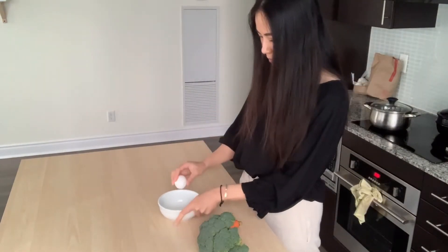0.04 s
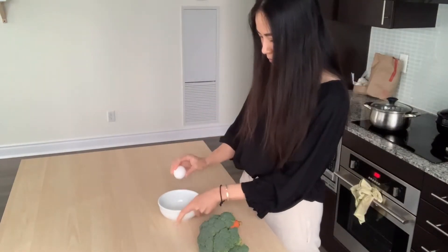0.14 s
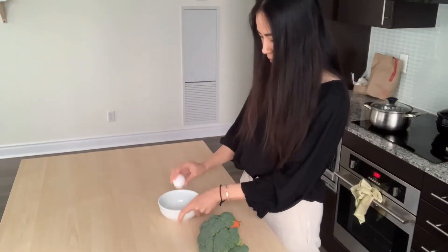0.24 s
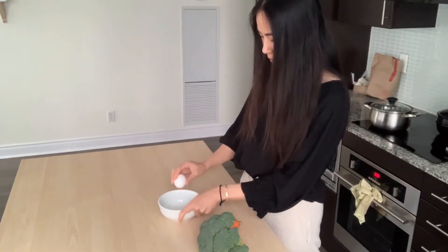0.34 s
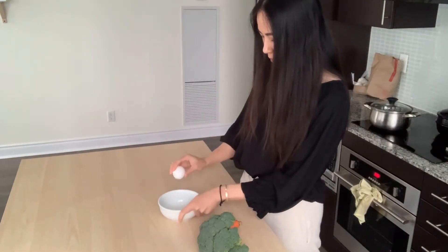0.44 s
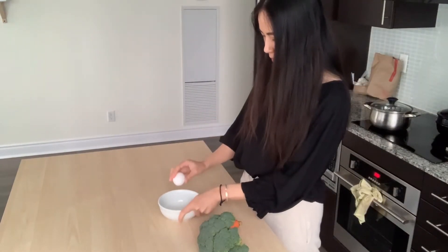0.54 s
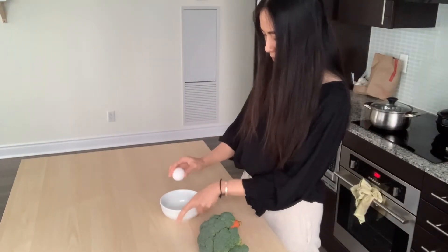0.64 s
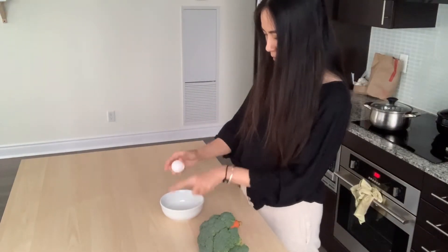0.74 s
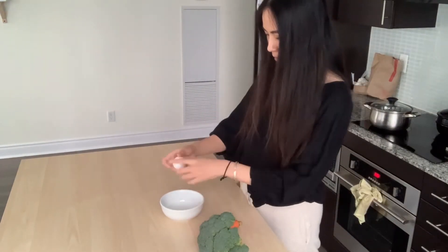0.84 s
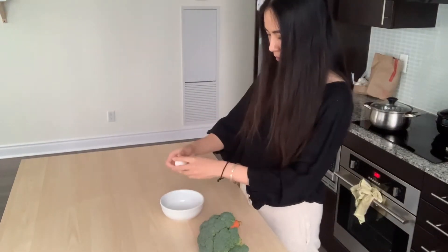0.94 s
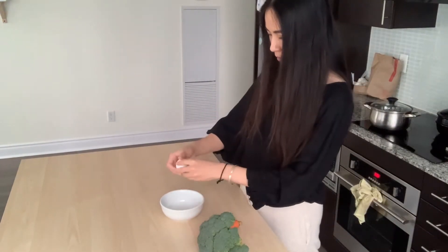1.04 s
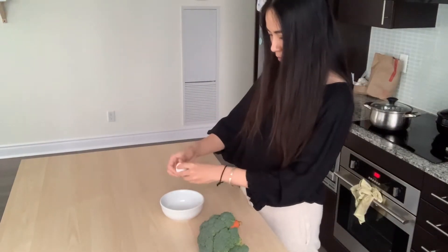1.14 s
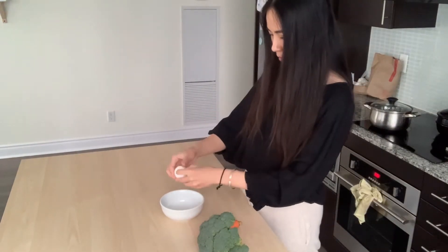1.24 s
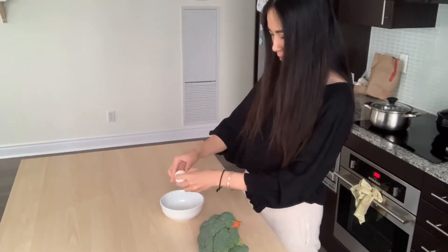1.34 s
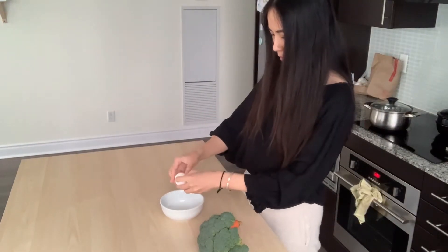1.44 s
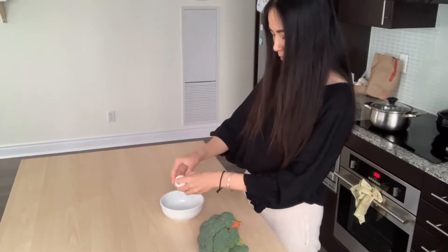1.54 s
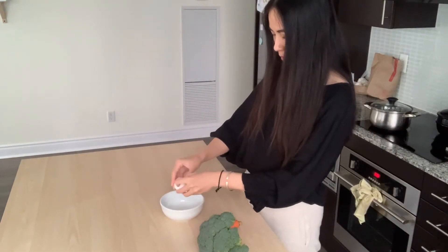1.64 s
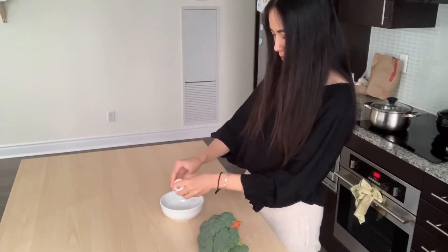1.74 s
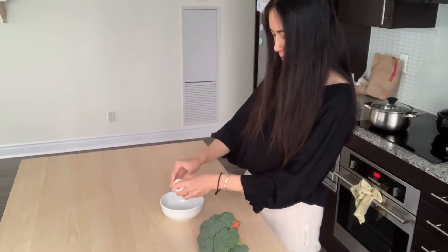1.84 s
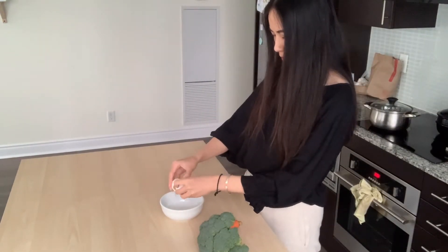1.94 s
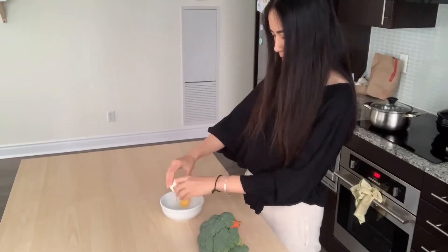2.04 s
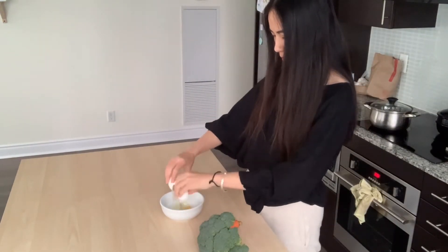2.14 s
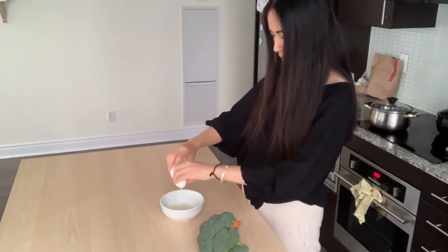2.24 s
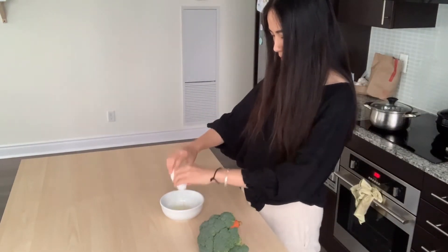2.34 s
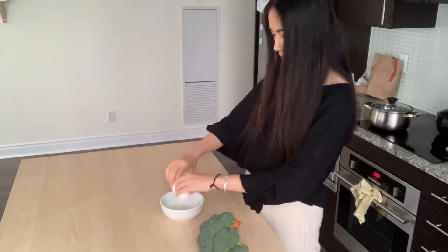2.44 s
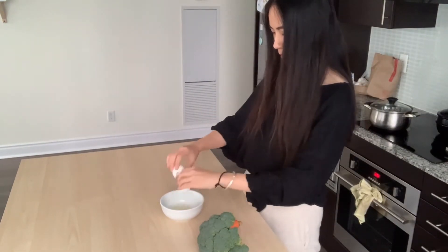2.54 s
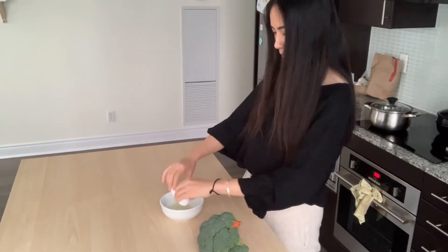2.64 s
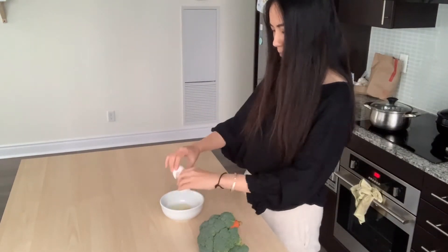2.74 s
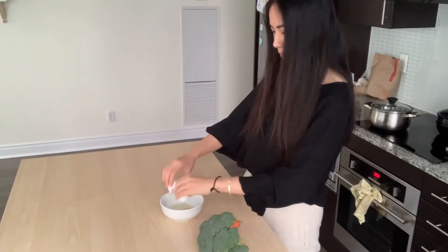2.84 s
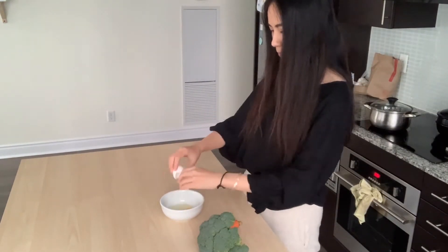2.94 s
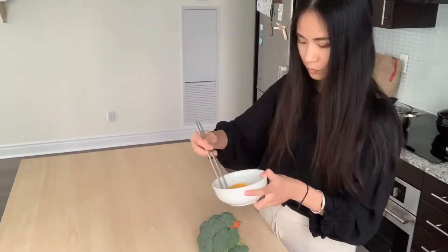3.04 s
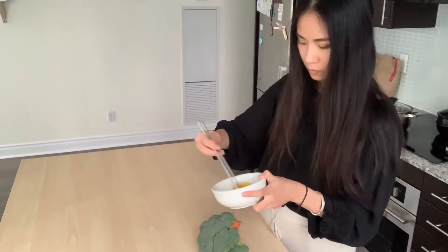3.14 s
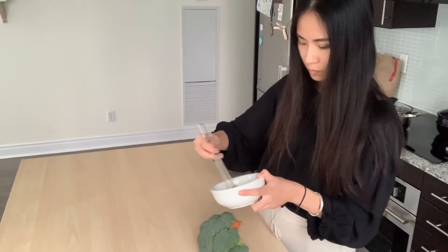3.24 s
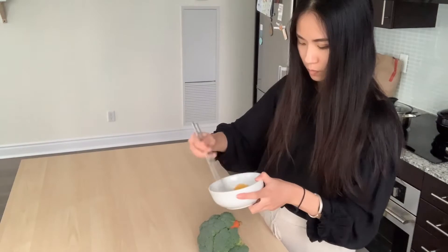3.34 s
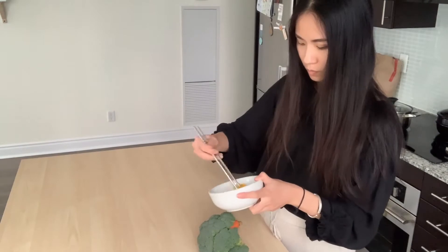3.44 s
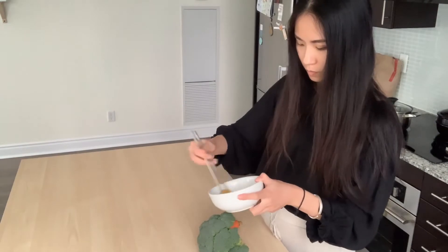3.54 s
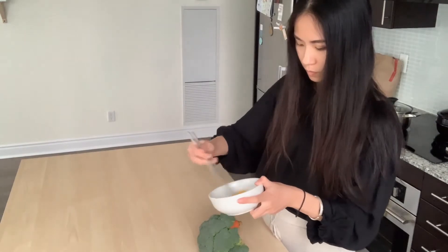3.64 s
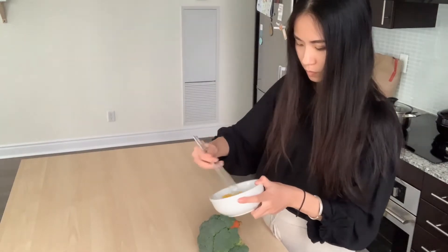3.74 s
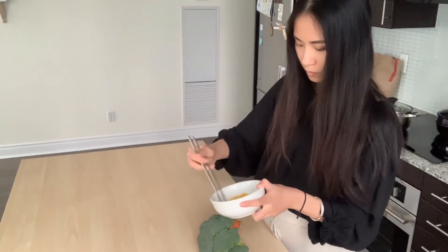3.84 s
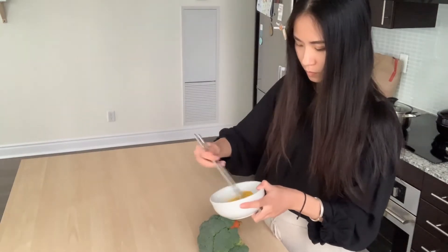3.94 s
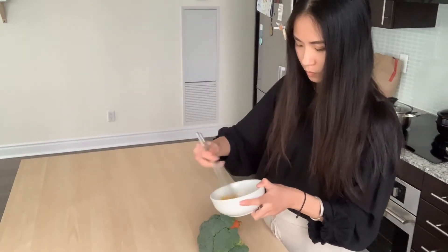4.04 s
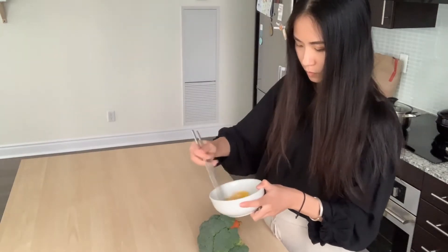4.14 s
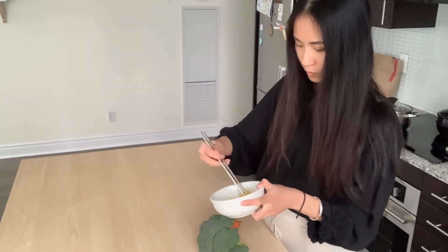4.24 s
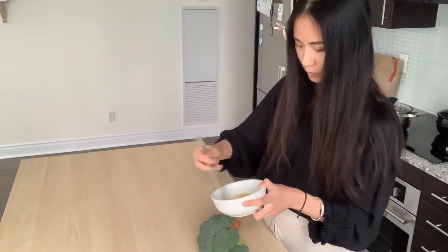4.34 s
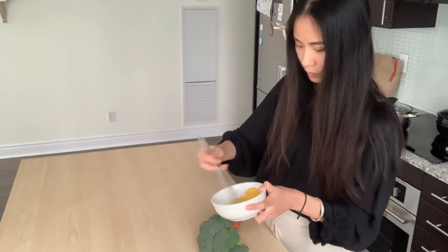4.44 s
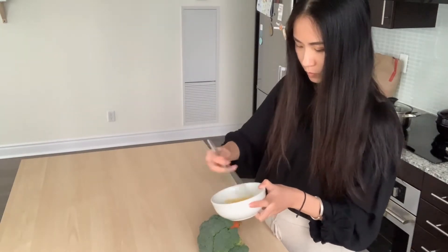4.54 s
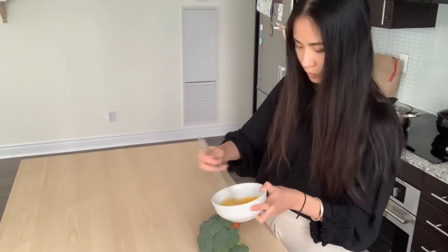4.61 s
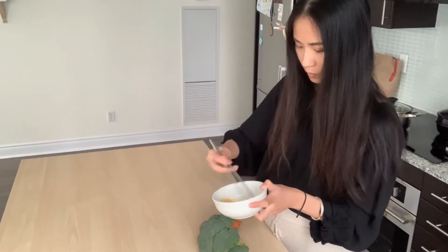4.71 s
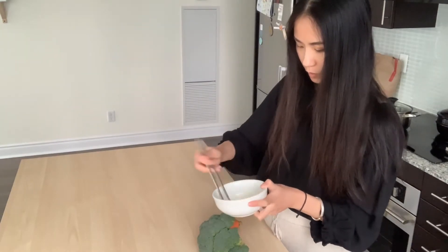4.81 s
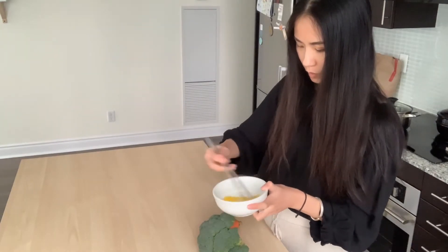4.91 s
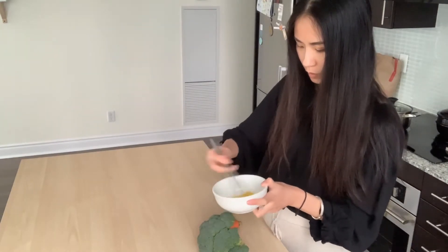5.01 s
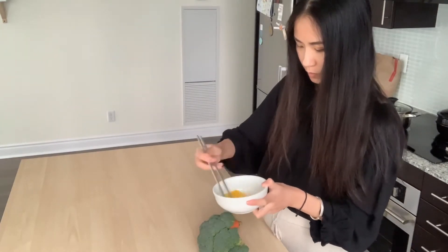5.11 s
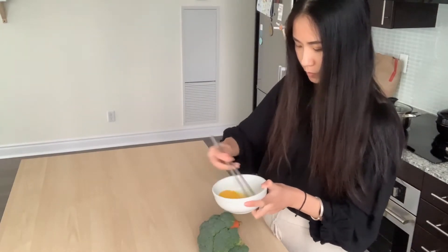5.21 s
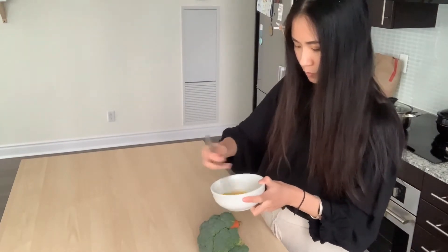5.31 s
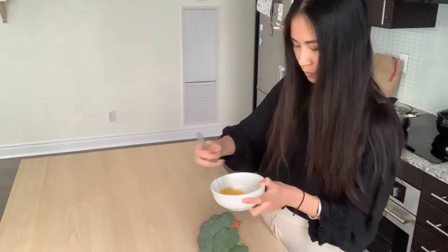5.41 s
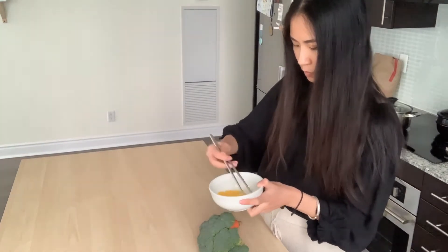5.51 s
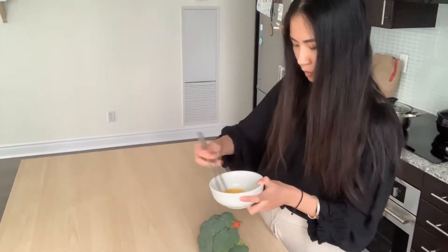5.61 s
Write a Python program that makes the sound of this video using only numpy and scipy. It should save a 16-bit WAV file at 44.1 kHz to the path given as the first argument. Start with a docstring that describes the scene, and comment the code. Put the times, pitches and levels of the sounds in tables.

```python
"""The last of an egg's knock on the rim of a ceramic bowl, on a wooden table, is heard first; another follows.
The shell is snapped open and the egg drops in. Then the bowl is held in the hand and metal chopsticks beat
the egg, about six strokes a second: each clinks on the wall and stirs up small bubbles. Contacts are bursts
of coloured noise and decaying modes, bubbles are gliding sines. A close microphone pair hears it all in a
bare, lively kitchen over a low rumble that is filtered noise."""
import sys
import numpy as np
from scipy import signal
from scipy.fft import rfft, irfft, next_fast_len
from scipy.io import wavfile
from scipy.ndimage import uniform_filter1d

SR = 44100
rng = np.random.default_rng(int(sys.argv[2]) if len(sys.argv) > 2 else 0)


def wav_out(sig):
    """Save sig, one row per channel (or a flat mono array), as 16-bit PCM at SR to the path in sys.argv[1]."""
    wavfile.write(sys.argv[1], SR, np.round(np.clip(np.atleast_2d(sig).T, -1, 1) * 32767).astype(np.int16))


N = 250047
TIME = np.arange(N) / SR
AGE = TIME[:SR // 2]   # time since a sound began, up to half a second

# Beating strokes as the first tip lands. Each row: start in seconds, level in dB, tick t60 in seconds,
# relative level in dB of each of four mode pairs, spot on the wall (0 thin, 1 full).
STROKES = [(3.074, -17, 0.0075, 1.5, 4, 0.5, -14, 0.11), (3.234, -15.5, 0.0019, -8, -15, -2.5, -2.5, 0.11),
           (3.400, -19, 0.016, -5, -4.5, 3, -1, 0.26), (3.550, -14.5, 0.0053, -14.5, -11, -13.5, 0, 0.19),
           (3.7148, -14.5, 0.0045, -4, 1, -2.5, 2, 0.38), (3.879, -20, 0.013, 4.5, 4, 1.5, 6, 0.5),
           (4.037, -16.5, 0.014, -0.5, -3, 5.5, -19, 0.39), (4.196, -14, 0.0066, -4.5, -5.5, -4, -17, 0.16),
           (4.3605, -15, 0.0087, -4, -2, -6, -8, 0.55), (4.5075, -12.5, 0.0079, -6.5, 1, -25, 1, 0.42),
           (4.666, -18.5, 0.008, 1.5, 0, -16, 8.5, 0.69), (4.826, -19.5, 0.012, 0, -6.5, -1, -2.5, 1.43),
           (4.996, -20.5, 0.014, -5, -4, -5.5, -10, 0.87), (5.154, -20, 0.0099, -9, -4, -4.5, 0, 1.11),
           (5.306, -19, 0.0087, -7, -9, -6, -8, 1.05), (5.462, -20.5, 0.011, -4.5, -9.5, -4, -2, 1.2)]
# A tip grazes the wall between strokes. Each row: start in seconds, relative level in dB.
GRAZES = [(3.043, -33), (3.128, -42), (3.789, -28.5), (4.098, -28.5), (4.28, -22.5), (5.127, -33),
          (5.276, -38), (5.353, -27), (5.512, -34.5), (5.609, -39)]
# The bare contact of metal on glaze. Each row: frequency in Hz, relative level in dB per Hz.
CONTACT = [(200, -28), (350, -16), (600, -14), (1100, -3), (1800, -2), (2400, 2), (3000, 1), (3800, 9.5),
           (5200, -2.5), (6600, 13), (8000, 6), (11000, 4), (13000, 7.5), (14200, 12), (15200, 8),
           (16000, -14.5)]
# Low mids of the beating as it goes on. Each row: time in seconds, level change in dB.
LOW_MIDS = [(3.07, 2), (3.55, 6), (3.85, 3), (4.36, 4), (4.52, -1), (5.5, 1.5)]


def from_db(db):
    """Decibels to gain."""
    return 10 ** (np.asarray(db) / 20)


def rms_one(x):
    """Scale to rms 1."""
    return x / np.sqrt(np.mean(x ** 2) + 1e-20)


def dying(t, t60):
    """A gain that falls 60 dB in t60 seconds, down to -300 dB."""
    return np.exp(-np.log(1000) * np.minimum(t / t60, 5))


def at_hz(points, hz):
    """Read a table on a log-frequency axis."""
    known_hz, values = np.transpose(points)
    return np.interp(np.log(np.maximum(hz, 1)), np.log(known_hz), values)


def colour(x, spectrum, size=4096):
    """Minimum-phase filter with the given spectrum: nothing sounds early."""
    log_gain = np.log(from_db(at_hz(spectrum, np.fft.rfftfreq(size, 1 / SR))))
    cepstrum = irfft(log_gain)
    # folding the cepstrum onto positive time makes the phase minimum
    cepstrum[1:size // 2] *= 2
    cepstrum[size // 2 + 1:] = 0
    response = irfft(np.exp(rfft(cepstrum)))
    length = x.shape[-1]
    padded = next_fast_len(length + size, True)
    return irfft(rfft(x, padded) * rfft(response, padded), padded)[..., :length]


def add(track, s, sound):
    """Mix a sound in at time s; what lies outside the track is cut off."""
    start = round(s * SR)
    part = sound[..., max(-start, 0):max(N - start, 0)]
    first = max(start, 0)
    track[..., first:first + part.shape[-1]] += part


def clicks(per_s, size):
    """Sparse clicks of uneven strength."""
    return rng.standard_normal(size) * (rng.random(size) < per_s / SR)


def hump(s, length):
    """A smooth rise and fall around time s."""
    return np.exp(-np.minimum((2 * (TIME - s) / length) ** 2, 20))


def burst(spectrum, t60):
    """A contact: a coloured spray of micro-impacts that starts near rms 1 and dies."""
    fade = dying(AGE, t60)
    spray = colour(rng.standard_normal(len(AGE)) * fade, spectrum)
    return rms_one(spray) * np.sqrt(np.mean(fade ** 2))


def struck(modes, spread_db, detune):
    """Every blow lands elsewhere: each mode answers with its own strength and a slightly shifted pitch."""
    hz, db, t60 = np.transpose(modes)[:, :, None]
    strength, shift, phase = rng.standard_normal((3, len(modes), 1))
    swing = np.sin(2 * np.pi * (hz * (1 + detune * shift) * AGE + phase))
    return np.sum(from_db(db + spread_db * strength) * dying(AGE, t60) * swing, axis=0)


def evened(response, width_hz):
    """Level out the broad peaks and dips of a scatter of reflections, keeping its energy."""
    spectrum = rfft(response)
    power = uniform_filter1d(np.abs(spectrum) ** 2, max(int(width_hz * len(AGE) / SR), 1))
    level = irfft(spectrum / np.sqrt(power + 1e-20), len(AGE)) * (AGE < .4)
    return rms_one(level) * np.sqrt(np.mean(response ** 2))


def kitchen(wet_db, near_db):
    """Stereo response: direct sound, table-top reflections and a diffuse tail that dies band by band."""
    # Decay of the room. Each row: frequency in Hz, t60 in seconds.
    room_t60 = [(80, 0.217), (250, 0.42), (1400, 0.51), (4000, 0.45), (7000, 0.41), (14000, 0.11)]
    # Strength of the reverberation. Each row: frequency in Hz, level in dB before wet_db.
    room_colour = [(100, -11), (400, -1.5), (1400, -2.5), (4000, -1), (7000, -4.5), (10000, -10),
                   (14000, -2)]
    edges = np.geomspace(40, 19000, 13)
    tail = np.zeros((2, len(AGE)))
    for low, high in zip(edges, edges[1:]):
        band_pass = signal.butter(2, [low, high], "band", fs=SR, output="sos")
        band = signal.sosfilt(band_pass, rng.standard_normal(tail.shape))
        tail += band * dying(AGE, at_hz(room_t60, np.sqrt(low * high)))
    tail *= np.clip(AGE / 0.011, 0, 1)   # the tail builds up over 11 ms
    scatter = rng.standard_normal(tail.shape) * dying(AGE, .02) * (AGE > .001)
    near = evened(scatter, width_hz=100)
    early = from_db(near_db) * rms_one(near) / np.sqrt(len(AGE))
    early[[0, 1], [3, 0]] += 1   # direct sound: the right port is reached three samples sooner
    late = colour(rms_one(evened(tail, width_hz=60)), room_colour) / np.sqrt(len(AGE))
    return early + from_db(wet_db) * late


def heard(x, room):
    """A sound at the bowl reaches both microphone ports through the room."""
    return signal.fftconvolve(x[None], room, axes=1)[:, :N]


def egg_knocks(room, ring_db, thud_db, crunch_db, give_s, pan_db):
    """The shell crunches on the rim; the blow goes through the bowl into the table and its modes ring."""
    # Egg on the rim; the first knock is already dying away. Each row: start in seconds, then level,
    # bass, treble and ringing, all relative in dB.
    knocks = [(-0.055, 0, -3.5, -18.5, 0.5), (0.29, -3, 4, 3, -1)]
    # Table and the bowl standing on it. Each row: frequency in Hz, relative level in dB, t60 in seconds.
    table_modes = [(125, -11, 0.22), (277.2, 5, 0.25), (313.7, -6.5, 0.35), (342.3, -8.5, 0.15),
                   (384, -4.5, 0.27), (417, -8, 0.49), (630, -1.5, 0.17), (823, -19, 0.28), (968, -7, .17),
                   (1020, -8.5, 0.32), (1203, -6, 0.11), (1283, -3, 0.072), (1437, -2, 0.16),
                   (2050, -14, 0.18), (2130, -16.5, 0.27), (2400, -13.5, 0.1), (2820, -16, 0.32),
                   (3600, -21.5, 0.56), (6600, -28.5, 0.25)]
    # Thud of the knock, and breaking shell. Each row: frequency in Hz, relative level in dB per Hz.
    thud_spectrum = [(35, -18), (65, -5), (98, -11.5), (128, -1.5), (200, -6.5), (350, -3), (520, -12.5),
                     (850, -15.5), (1400, -11.5), (2500, -24.5), (6000, -48.5), (12000, -57)]
    crunch_spectrum = [(300, -19.5), (800, -14.5), (1000, 0), (1300, 6), (1650, -5), (2000, -7), (2400, -2),
                       (2850, -9.5), (3100, -10), (4500, -11.5), (5600, -11), (7000, -10), (9000, -27.5),
                       (13000, -14), (16000, -20.5)]
    out = np.zeros((2, N))
    for s, db, bass_db, treble_db, ringing_db in knocks:
        blow = from_db(ring_db + ringing_db) * struck(table_modes, spread_db=0.5, detune=0.006)
        blow += from_db(thud_db) * burst(thud_spectrum, t60=0.38)
        blow += from_db(crunch_db) * burst(crunch_spectrum, t60=0.017)
        blow *= np.minimum(AGE / give_s, 1)   # the shell gives way first
        tone = [(270, db + bass_db), (480, db), (4000, db + treble_db), (12000, db + 2 * treble_db)]
        add(out, s, heard(colour(blow, tone), room))
    return out * from_db([[pan_db], [-pan_db]])


def noise(spectrum, width):
    """Stereo noise of rms 1; width is the weight of the part that is opposite in the two sides."""
    mid, side = colour(rng.standard_normal((2, N)), spectrum)
    return rms_one(mid + width * side * [[1], [-1]])


def background(swell_db, sleeve_db, pan_db):
    """The room rumbles and hisses faintly as coloured noise; a sleeve brushes past now and then."""
    # Sleeve, deep rumble and air. Each row: frequency in Hz, relative level in dB per Hz.
    cloth_spectrum = [(300, 12.5), (800, -4.5), (1500, -4), (2500, -17.5), (4000, -37), (9000, -68),
                      (14000, -63)]
    deep_spectrum = [(20, -8.5), (40, -11), (63, 8.5), (80, 4.5), (110, -16.5), (200, -48), (2000, -99)]
    air_spectrum = [(50, -22), (100, 4), (174, 2.5), (260, -7.5), (350, -14), (420, -7), (520, -19.5),
                    (900, -28.5), (1450, -30.5), (3300, -41.5), (7000, -47), (11000, -51), (13000, -79)]
    # Brushes of the sleeve, swells of the rumble. Each row: middle and length in seconds, relative dB.
    brushes = [(0.678, 0.14, -53), (1.084, 0.023, -60), (1.386, 0.12, -73), (1.673, 0.077, -73),
               (2.61, 0.13, -68.5), (2.797, 0.1, -70)]
    swell_rows = [(2.508, 0.24, -46), (2.945, 0.16, -44.5), (3.378, 0.18, -47), (4.078, 0.22, -54),
                  (4.507, 0.14, -52.5), (5.253, 0.2, -55)]
    deep_db, deep_drop_db = -55.5, 9
    air_db, air_drop_db = -56, 10
    # the background drops over 0.22 s from 3 s
    settled = np.clip((TIME - 3) / 0.22, 0, 1)
    swells = sum(from_db(db + swell_db) * hump(s, length) for s, length, db in swell_rows)
    deep_level = np.hypot(from_db(deep_db - deep_drop_db * settled), swells)
    deep = deep_level * noise(deep_spectrum, width=0.86)
    air = from_db(air_db - air_drop_db * settled) * noise(air_spectrum, width=0.99)
    brushing = sum(from_db(db + sleeve_db) * hump(s, length) for s, length, db in brushes)
    sleeve = brushing * noise(cloth_spectrum, width=0.78)
    return (deep + air) * from_db([[pan_db], [-pan_db]]) + sleeve


def shell_snaps(crack_db, crumble_db, crumble_t60, flakes_per_s):
    """Small fractures as the thumbs pull the halves apart, each with a crackle of flakes after it."""
    # Each row: start in seconds, relative level in dB.
    snaps = [(1.26, -70.5), (1.653, -65.5), (1.769, -56), (1.773, -42), (1.802, -57), (1.848, -58),
             (1.936, -60), (1.939, -60), (2.429, -74)]
    # Snapping shell. Each row: frequency in Hz, relative level in dB per Hz.
    snap_spectrum = [(400, 10), (1200, -4), (2400, -0.5), (4200, 10.5), (7000, 4.5), (9500, -4),
                     (13000, -3.5), (16000, -9)]
    out = np.zeros(N)
    for s, db in snaps:
        flakes = np.sign(clicks(flakes_per_s, len(AGE))) * rng.uniform(.3, 1, len(AGE))
        crumble = rms_one(colour(flakes, snap_spectrum)) * dying(AGE, crumble_t60)
        crack = burst(snap_spectrum, t60=0.0051)
        add(out, s, from_db(db + crack_db) * crack + from_db(db + crumble_db) * crumble)
    return out


def bubble(hz, glide, t60, rise_s):
    """A pocket of air swells, rings and slides in pitch by glide octaves per second."""
    age = AGE[AGE < rise_s + t60]
    swell = np.minimum(age / rise_s, 1) * dying(np.maximum(age - rise_s, 0), t60)
    return np.sin(2 * np.pi * np.cumsum(hz * 2 ** (glide * age)) / SR) * swell


def liquid(splash_db, splash_t60, froth_db, low_hz, high_hz, trail_s, count):
    """Single plops with a wet splash, and a trail of small bubbles behind every stroke."""
    # Larger bubbles and drops of egg. Each row: start in seconds, frequency in Hz, level in dB,
    # glide in octaves per second, swell in seconds.
    plops = [(1.86, 2400, -59, 9, 0.0057), (1.945, 2330, -57.5, 4, 0.0034), (2.101, 4820, -62, -20, 0.011),
             (2.187, 2010, -55.5, 2.5, 0.0025), (2.208, 2070, -60.5, 0, 0.0038),
             (2.238, 2025, -60, 2.5, 0.0036), (4.29, 2196, -41.5, -18, 0.0022),
             (4.346, 1976, -54, 2, 0.0045), (4.395, 1124, -45.5, 9, .005), (4.862, 1020, -43, 13, 0.0063),
             (4.93, 1186, -43.5, -1, 0.0084), (5.55, 970, -38, 2.5, 0.0065)]
    out = np.zeros(N)
    for s, hz, db, glide, swell_s in plops:
        splash_spectrum = [(hz / 2, -36), (hz, 0), (2 * hz, -36), (4 * hz, -60)]
        add(out, s, from_db(db + splash_db) * burst(splash_spectrum, splash_t60))
        add(out, s, from_db(db) * bubble(hz, glide, t60=0.038, rise_s=swell_s))
    for s, db, *_ in STROKES:
        for delay, pitch, size in rng.random((count, 3)):
            hz = low_hz * (high_hz / low_hz) ** pitch
            small = bubble(hz, glide=3.5, t60=18 / hz, rise_s=1 / hz)
            add(out, s + trail_s * delay, from_db(db + froth_db - 11.4 * size) * small)
    return out


def bowl_modes(s):
    """The place where the latest stroke landed decides how strongly each mode pair answers."""
    # The held bowl rings in close pairs. Each row: frequency in Hz, relative level in dB, t60 in seconds.
    held_bowl = [(1432, -9.5, 0.14), (1455, -5, 0.083), (3614, -9, 0.18), (3807, -5.5, 0.079),
                 (6310, -5.5, 0.079), (6394, 7, 0.092), (9784, 1.5, 0.17), (9810, -5.5, 0.067),
                 (13900, 6.5, 0.035), (14080, -3, 0.044)]
    # Main mode pairs that the strokes weight: one frequency in Hz each.
    pair_hz = [1450, 3700, 6400, 13800]
    starts = [row[0] for row in STROKES]
    latest = max(np.searchsorted(starts, s, "right") - 1, 0)
    weights = list(zip(pair_hz, STROKES[latest][3:-1]))
    return [(hz, db + at_hz(weights, hz), t60) for hz, db, t60 in held_bowl]


def at_spot(sound, s):
    """Colour a contact by the spot on the wall that the tips reach at time s."""
    # Change of colour from spot 0 to spot 1. Each row: frequency in Hz, change in dB.
    spot_colour = [(500, 8.5), (1000, 7), (1500, 0.5), (2500, -4.5), (3000, 6), (3500, 16), (3900, 7.5),
                   (4300, 9), (5200, -5), (6400, 0), (7200, -2.5), (13000, -1.5)]
    times, *_, spots = np.transpose(STROKES)
    spot = np.interp(s, times, spots)
    low_mid_db = np.interp(s, *np.transpose(LOW_MIDS))
    return colour(sound, [(hz, (spot - .5) * db + low_mid_db * (hz < 2000)) for hz, db in spot_colour])


def clink(s, click_db, tick_db, tick_t60, skid_db, skid_t60, bowl_db, stick_db, landing_s):
    """A tip clicks on the wall, chatters, skids and sets bowl and stick ringing; then the sticks rattle."""
    # The metal chopsticks, their pitches shifting with the grip.
    # Each row: frequency in Hz, relative level in dB, t60 in seconds.
    stick_modes = [(1201, -18.5, 0.041), (2317, -12.5, 0.023), (2640, -14.5, 0.022), (3537, -6, 0.031),
                   (3800, -14, 0.069), (4063, -23, 0.029), (4050, -8.5, 0.032), (4160, -6.5, 0.038),
                   (6610, 4, 0.028), (6680, 2, 0.031), (6830, 0, 0.014), (10620, -6, 0.012)]
    rattle_s, rattle_db, rattle_fade_db = 0.1, -10, 56
    tick = from_db(tick_db) * burst(CONTACT, tick_t60)
    slips = clicks(2100, len(AGE))   # per second
    skid = from_db(skid_db) * rms_one(colour(slips, CONTACT)) * dying(AGE, skid_t60)
    ring = from_db(bowl_db) * struck(bowl_modes(s), spread_db=2.0, detune=0.003)
    ring += from_db(stick_db) * struck(stick_modes, spread_db=6.5, detune=0.017)
    # each contact fades in over landing_s, with a single sharp click halfway
    sound = (tick + skid + ring) * np.minimum(AGE / landing_s, 1)
    impact = 1. * (np.arange(len(AGE)) == round(landing_s / 2 * SR))
    sound += from_db(click_db) * rms_one(colour(impact, CONTACT)) / np.sqrt(len(AGE))
    # the sticks knock together: four later, fainter ticks
    for delay in rng.random(size=4):
        lag = 1 + int(rattle_s * delay * SR)
        sound[lag:] += from_db(rattle_db - rattle_fade_db * delay) * tick[:-lag]
    return at_spot(sound, s)


def chopsticks():
    """Each stroke lands one tip, then the other with a stronger click and shorter skid; at times a tip grazes."""
    # The second tip follows, and sometimes bounces. Each row: start in seconds, relative level in dB,
    # tick t60 in seconds, relative ringing in dB.
    second_tips = [(3.081, -20, 0.003, -3), (3.115, -24, 0.0035, 8.5), (3.245, -24.5, 0.0053, 9.5),
                   (3.277, -28, .005, 6), (3.440, -37, 0.0035, 7), (3.588, -22.5, 0.0052, 0),
                   (3.753, -19, 0.0085, -7), (3.762, -28.5, 0.0025, 7), (3.914, -18, 0.0059, -4.5),
                   (4.070, -16.5, 0.0064, -3), (4.220, -16.5, 0.0056, -2), (4.385, -10, 0.0024, -3),
                   (4.5475, -13, 0.0036, 6.5), (4.557, -40, 0.0013, -16), (4.7095, -12, 0.0027, -5.5),
                   (4.72, -28, 0.0024, -10), (4.856, -31, 0.0045, 0), (4.864, -21, 0.006, 5.5),
                   (4.873, -31, 0.0033, -6), (5.016, -22, 0.0034, 8), (5.176, -29, 0.0033, 5),
                   (5.328, -24.5, 0.0067, 0), (5.485, -19.5, 0.0027, 2)]
    # The second tip against the first. Each row: frequency in Hz, change in dB.
    second_tip_colour = [(700, 4.5), (1150, 5.5), (1450, -9.5), (2000, -3.5), (3900, -0.5), (6600, -1.5),
                         (13000, 2)]
    out = np.zeros(N)
    for s, db, tick_t60, *_ in STROKES:
        first = clink(s, click_db=-4.0, tick_db=4.0, tick_t60=tick_t60, skid_db=-11.0, skid_t60=0.048,
                      bowl_db=-14.5, stick_db=-14.5, landing_s=0.0022)
        add(out, s, from_db(db) * first)
    for s, db, tick_t60, ring_db in second_tips:
        second = clink(s, click_db=0.5, tick_db=5.0, tick_t60=tick_t60, skid_db=-12.0, skid_t60=0.0063,
                       bowl_db=ring_db - 19, stick_db=-21.0, landing_s=0.0014)
        add(out, s, from_db(db) * colour(second, second_tip_colour))
    for s, db in GRAZES:
        graze = clink(s, click_db=4.0, tick_db=-1.0, tick_t60=0.0054, skid_db=-13.5, skid_t60=0.11,
                      bowl_db=-15.0, stick_db=-17.0, landing_s=0.0018)
        add(out, s, from_db(db) * graze)
    return out


def sloshing(level_db, slosh_t60):
    """Every stroke shoves the egg round the bowl with a soft, low gulp: a burst of low noise."""
    # Egg churning in the bowl. Each row: frequency in Hz, relative level in dB per Hz.
    slosh_spectrum = [(120, -25), (300, 5.5), (450, 0), (700, -12.5), (2000, -37)]
    out = np.zeros(N)
    for s, *_ in STROKES:
        gulp_db = level_db + np.interp(s, *np.transpose(LOW_MIDS))
        add(out, s, from_db(gulp_db) * burst(slosh_spectrum, slosh_t60))
    return out


def drags(level_db, slips_per_s):
    """After landing, metal sticks and slips on the glaze: a short run of uneven clicks."""
    # The tips drag along the wall. Each row: start and length in seconds, relative level in dB,
    # rasp around 5 kHz in dB.
    drag_rows = [(3.093, 0.053, -39, -3.5), (3.247, 0.06, -40, -11), (3.418, 0.045, -41, -0.5),
                 (3.581, 0.046, -42, -3), (3.74, 0.015, -39.5, -2), (3.891, 0.053, -37.5, -6),
                 (4.055, 0.05, -44.5, 2.5), (4.216, 0.02, -38.5, 5.5), (4.407, 0.014, -47, 14),
                 (4.516, 0.045, -42.5, 12.5), (4.665, 0.016, -37.5, 8), (4.721, 0.034, -45, 7.5),
                 (4.879, 0.041, -46, 3), (5.01, 0.031, -37, -35), (5.169, 0.059, -48, -20),
                 (5.324, 0.045, -52, 4), (5.478, 0.068, -49, 0)]
    # Scraping metal. Each row: frequency in Hz, relative level in dB per Hz.
    scrape_spectrum = [(300, -14), (1000, -5.5), (2000, -2), (3100, -1.5), (3800, 15), (5200, 10),
                       (6100, 9.5), (6450, 17), (7000, 12.5), (8000, -13), (11000, 0.5), (13000, 1),
                       (13900, 6.5), (15000, -3), (16000, -18)]
    out = np.zeros(N)
    for s, length, db, rasp_db in drag_rows:
        pressure = np.sin(np.pi * np.minimum(AGE / length, 1))
        slips = clicks(slips_per_s, len(AGE))
        scrape = rms_one(colour(slips, scrape_spectrum)) * pressure
        rasping = colour(scrape, [(3600, 0), (5000, rasp_db), (6500, 0)])
        add(out, s, from_db(db + level_db) * at_spot(rasping, s))
    return out


def stick_chatter(level_db, from_s, ticks_per_s):
    """From from_s to the last graze the two sticks tick lightly against each other all the way round."""
    ticks = clicks(ticks_per_s, N)
    chatter = from_db(level_db) * rms_one(colour(ticks, CONTACT))
    return chatter * (TIME > from_s) * (TIME < GRAZES[-1][0])


def scene():
    """Knock, open, beat, all in one room."""
    room = kitchen(wet_db=-0.4, near_db=-3.5)
    knocks = egg_knocks(room, ring_db=-28.5, thud_db=-26.0, crunch_db=-17.0, give_s=0.0018, pan_db=0.36)
    at_bowl = shell_snaps(crack_db=5.5, crumble_db=-9.5, crumble_t60=0.17, flakes_per_s=380)
    at_bowl += liquid(splash_db=-9.5, splash_t60=0.022, froth_db=-36.5,
                      low_hz=930, high_hz=2430, trail_s=0.069, count=10)
    at_bowl += chopsticks()
    at_bowl += sloshing(level_db=-73.0, slosh_t60=0.58)
    at_bowl += drags(level_db=1.5, slips_per_s=500)
    at_bowl += stick_chatter(level_db=-53.0, from_s=4.3, ticks_per_s=250)
    return knocks + heard(at_bowl, room) + background(swell_db=-2.5, sleeve_db=2.0, pan_db=1.57)


def record(dry):
    """The close microphone pair is widest around 10 kHz and nearly mono above 13 kHz; the top is cut."""
    # What the pair does to sum and difference of its sides. Each row: frequency in Hz, gain in dB.
    mic_sum = [(100, -2.5), (6500, -0.5), (7300, 0.5), (8000, -5), (9300, -12.5), (10200, -0.5),
               (11000, 4.5), (13500, -2)]
    mic_difference = [(100, -9.5), (250, -7), (500, -0.5), (1500, -0.5), (6500, -2), (9800, 5.5),
                      (11500, 7), (12800, -21.5), (15000, -29.5)]
    mid = colour((dry[0] + dry[1]) / 2, mic_sum)
    side = colour((dry[0] - dry[1]) / 2, mic_difference)
    top_cut = signal.ellip(10, .2, 70, 16300, fs=SR, output="sos")   # low-pass, edge in Hz
    return signal.sosfilt(top_cut, mid + side * [[1], [-1]])


dry = scene()
out = record(dry)
wav_out(out)
```